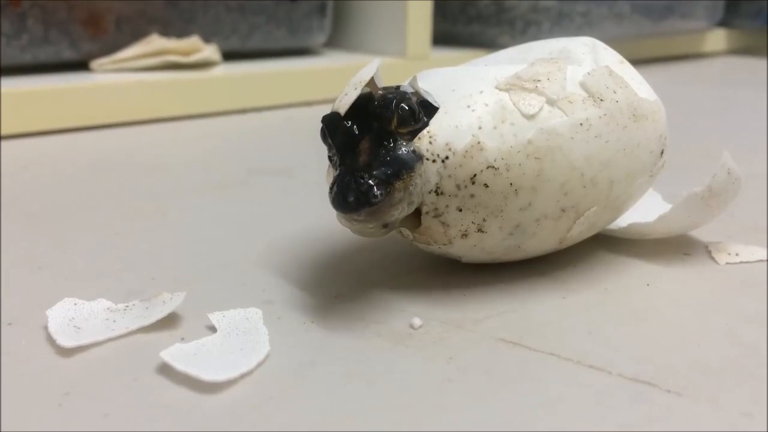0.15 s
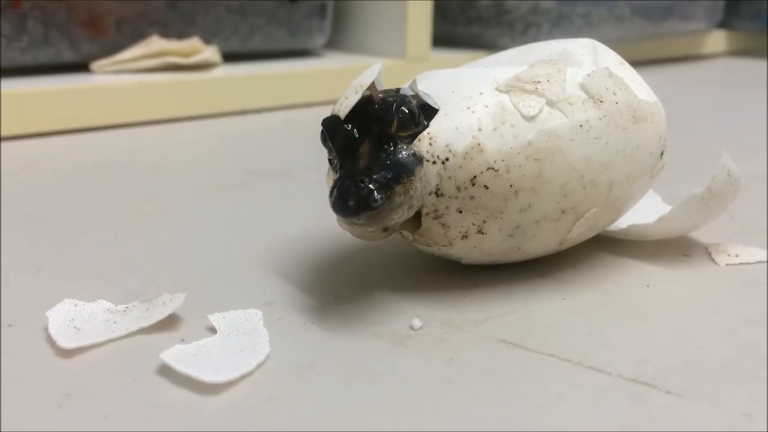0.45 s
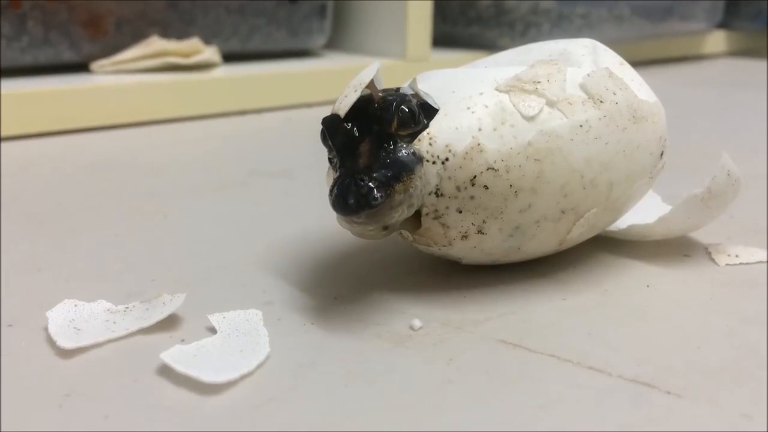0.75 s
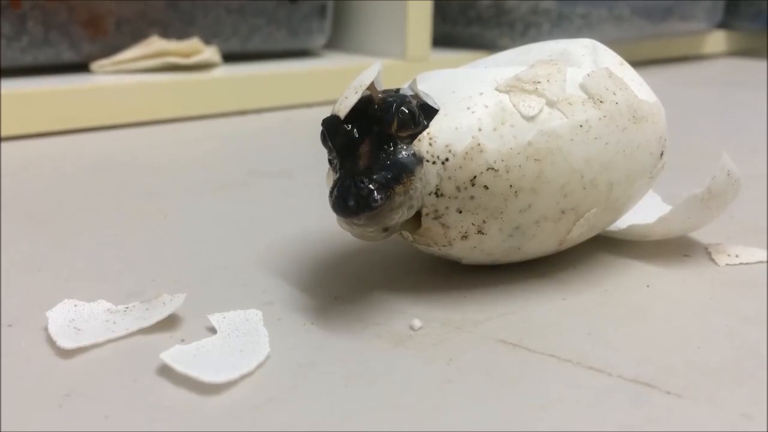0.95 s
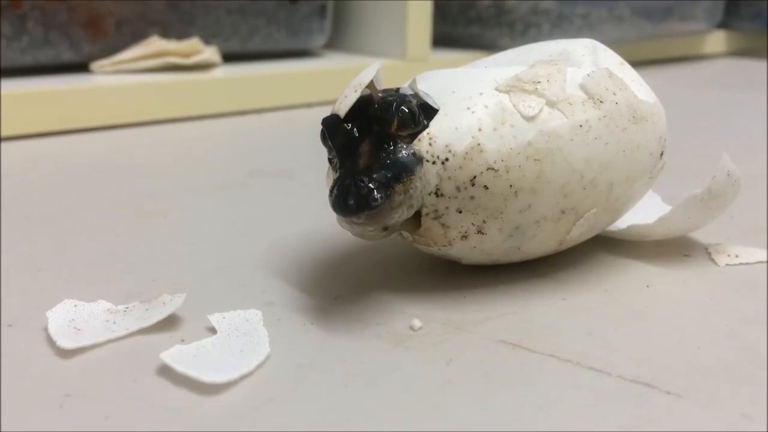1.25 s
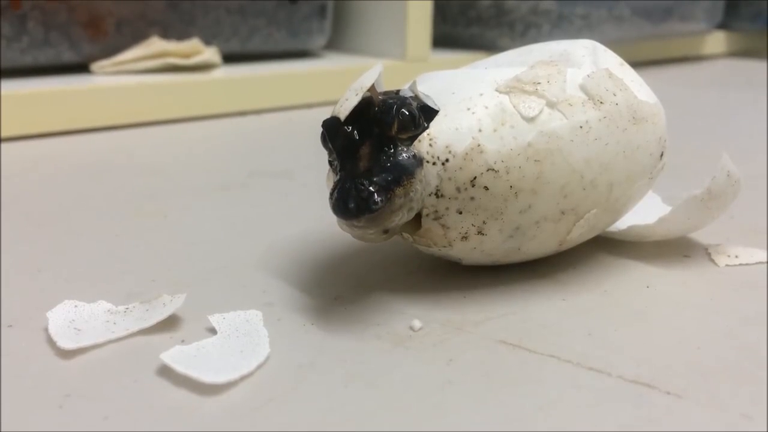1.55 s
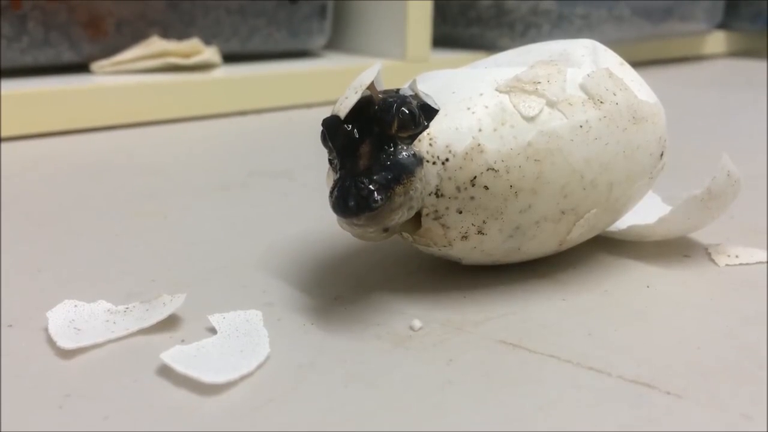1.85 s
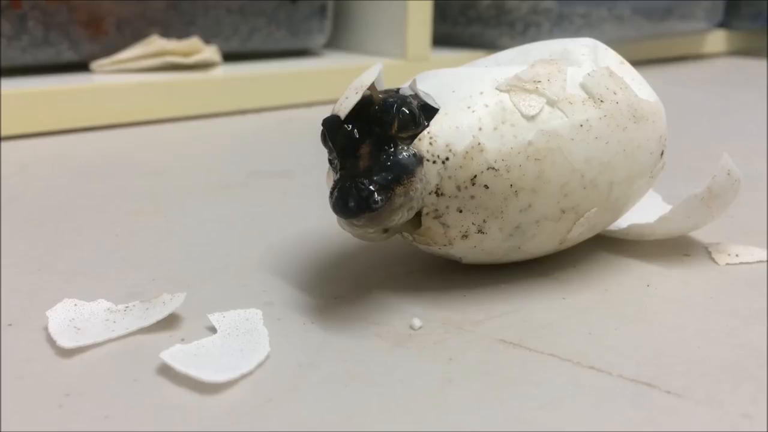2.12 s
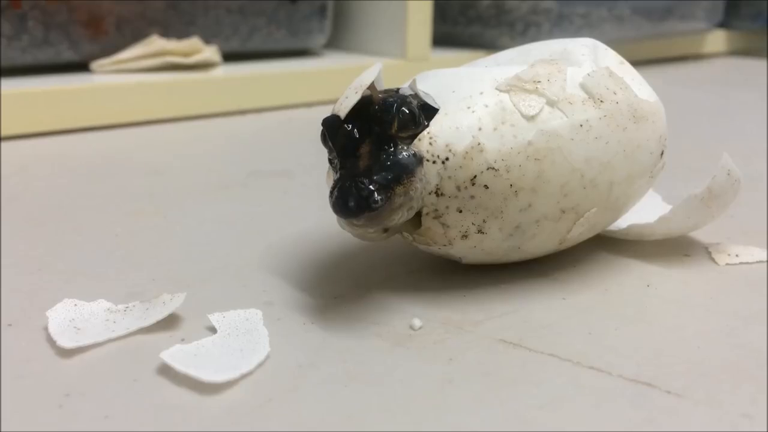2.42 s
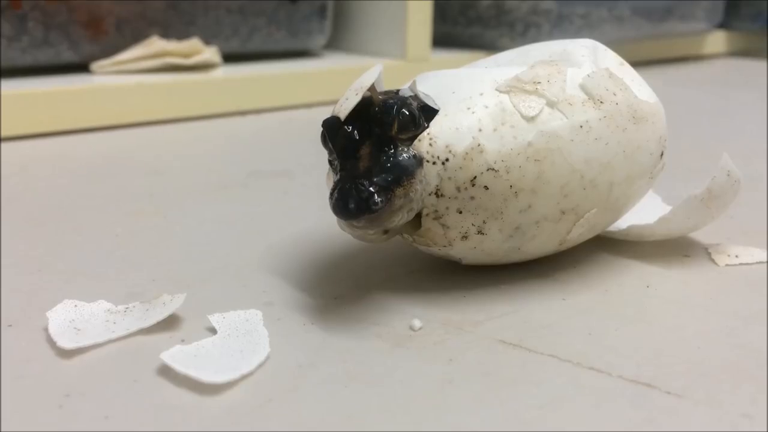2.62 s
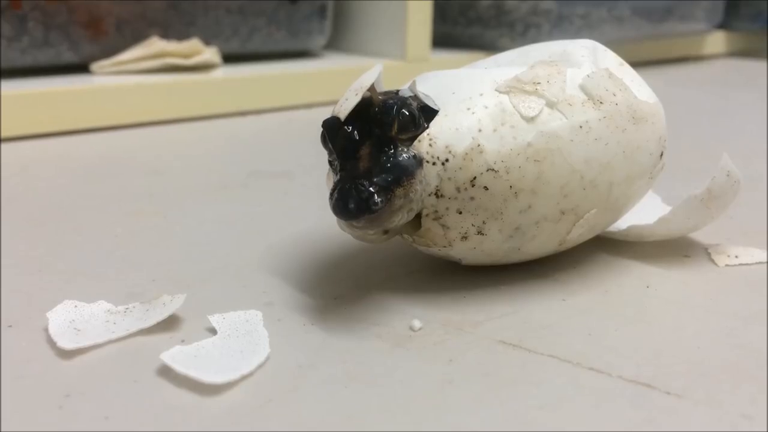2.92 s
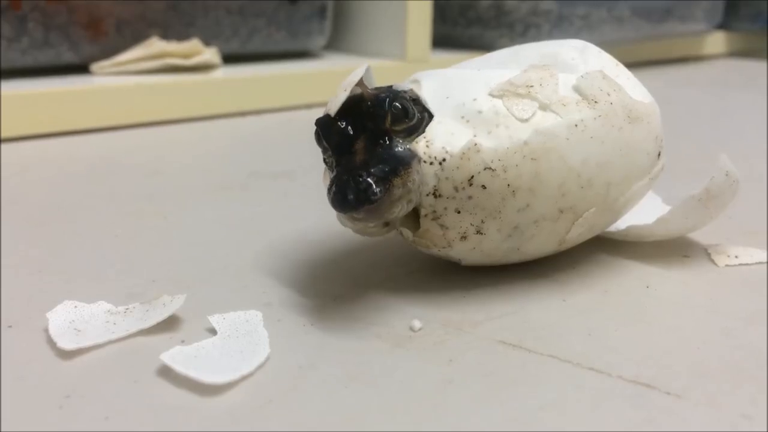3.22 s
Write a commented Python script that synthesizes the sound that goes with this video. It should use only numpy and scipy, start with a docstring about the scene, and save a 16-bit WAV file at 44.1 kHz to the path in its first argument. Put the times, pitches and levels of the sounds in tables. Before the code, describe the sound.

One brief falling chirp from a hatching baby alligator, after seconds of faint ventilation noise.

```python
"""Hatchling alligator, one yelp

Small room, phone microphone close by: ventilation hums, a motor tone fades in and out, something rustles.
Far-off peeps are swept sines; air, hums and rustle are shaped noise.
A hatchling, head out of its egg on a table, gives one falling yelp: harmonics and rasp through a throat.
Its push sets the table ringing in low damped modes. The room echoes the peeps and the yelp;
their mid range is repeated faintly higher up by frequency shifting.
"""
import sys
import numpy as np
from scipy import signal
from scipy.fft import rfft, irfft
from scipy.io import wavfile
from scipy.ndimage import uniform_filter1d

SR = 44100
rng = np.random.default_rng(int(sys.argv[2]) if len(sys.argv) > 2 else 0)


def materialize(psi):
    """Save the field psi as 16-bit PCM at rate SR to the path in sys.argv[1].

    A 1-D psi becomes a single channel; in a 2-D psi each row is a channel.
    """
    bounded = np.clip(np.atleast_2d(psi).T, -1, 1)
    quanta = np.round(bounded * 32767).astype(np.int16)
    wavfile.write(sys.argv[1], SR, quanta)


def volts(x):
    """Linear amplitude factor 10**(x/20) for a level x in dB, scalar or array-like."""
    e = np.asarray(x, float) / 20
    return 10 ** e


N = 148617  # samples


def colour(hz, table):
    """Gain at hz from an (f/Hz, level/dB) table, interpolated over log frequency."""
    f, db = np.array(table, float).T
    return volts(np.interp(np.log(np.maximum(hz, 1)), np.log(f), db))


def noise(shape):
    """Noise of rms 1 with the amplitude spectrum shape(Hz)."""
    x = irfft(rfft(rng.standard_normal(N)) * shape(np.fft.rfftfreq(N, 1 / SR)), N)
    return x / x.std()


def walk(rate):
    """Smooth random drift, rms about 1: levels held 1 / rate s and averaged twice."""
    hold = int(SR / rate)
    steps = np.repeat(rng.standard_normal(N // hold + 1), hold)
    return 1.42 * uniform_filter1d(uniform_filter1d(steps, hold), hold)[:N]


# spectrum of the room air: f/Hz, relative level per Hz/dB
AIR_SPECTRUM = [(15, -3.5), (30, -3.5), (55, -1), (140, -1), (250, -9.5), (450, -11), (800, -16.5),
                (1500, -21), (3000, -25.5), (4400, -28), (4650, -30.5), (7000, -31), (9500, -34),
                (12000, -35), (14000, -35.5), (15400, -43)]
AIR_DB, SWELL_DB, FLICKER_DB = -61.5, -0.57, 2.5


def room_air():
    """Octave bands of hiss swell together and flicker alone, the low ones most."""
    swell = walk(1.5)
    white = rfft(noise(lambda f: colour(f, AIR_SPECTRUM)))
    octave = np.log2(np.maximum(np.fft.rfftfreq(N, 1 / SR), 1) / 16)  # octaves above 16 Hz
    air = 0
    for k in range(11):
        depth = 1 / (1 + (k / 6) ** 4)
        band = irfft(white * np.clip(1 - abs(octave - k), 0, 1), N)
        air = air + band * volts(depth * (SWELL_DB * swell + FLICKER_DB * walk(22.97)))
    return volts(AIR_DB) * air


# standing tones of the ventilation: f/Hz, width at half amplitude/Hz, level before the swell/dB
HUM_TONES = [(85, 7.6, -62.5), (109.5, 8.7, -60.5), (175.6, 12.6, -67), (296.4, 17, -78),
             (393.5, 14, -76.5), (434.6, 12, -77.5), (565.3, 10, -81.5), (694.5, 47, -76.5),
             (1080, 16, -84.5)]
# the hums swell and sink together: t/s, gain/dB
HUM_SWELL_CURVE = [(0, -1), (.5, -1), (.9, 0), (1.4, 0.5), (1.85, 2.5), (2.3, -3.5), (2.7, 4), (3.37, -5.5)]
WAVER_DB = 1.5


def ventilation(t):
    """Each hum is a narrow band of noise wavering by itself under one common swell."""
    hum = 0
    for hz, width, db in HUM_TONES:
        tone = noise(lambda f: 1 / (1 + (2 * (f - hz) / width) ** 2))
        hum = hum + volts(db + WAVER_DB * walk(6.03)) * tone
    return hum * volts(np.interp(t, *np.array(HUM_SWELL_CURVE).T))


# fading of the motor tone: t/s, level/dB
MOTOR_FADE = [(0, -71.5), (.2, -65.5), (.7, -65.5), (.85, -73), (1.05, -82), (1.3, -69), (1.8, -71),
              (2.1, -76), (2.4, -71), (2.8, -73), (3.1, -74), (3.37, -83)]
MOTOR_HZ, MOTOR_DRIFT, MOTOR_WAVER_DB = 222.3, 0.0067, 2.2  # drift: share of the pitch


def motor(t):
    """One sine fades in and out, wavering slightly in pitch and level."""
    s, db = np.array(MOTOR_FADE).T
    level = volts(np.interp(t, s, db) + MOTOR_WAVER_DB * walk(19))
    pitch = MOTOR_HZ * (1 + MOTOR_DRIFT * walk(5.16))
    return np.sqrt(2) * level * np.sin(2 * np.pi * np.cumsum(pitch) / SR)


# far-off peeps: t/s, length/s, start f/Hz, end f/Hz, peak level before the flutter/dB
FAR_PEEPS = [(.664, .036, 1540, 1060, -62.5), (.69, .06, 960, 700, -69), (1.07, .125, 1060, 1100, -70.5),
             (1.14, .065, 1310, 1410, -76)]
FAR_ROUGH, FAR_WOBBLE = 0.5, 0.025  # shares of the amplitude and of the pitch


def sibling(t):
    """Faint peeps from far away: swept sines broken up by random flutter."""
    flutter = 1 + FAR_ROUGH * walk(120)
    wobble = 1 + FAR_WOBBLE * walk(60)
    out = 0
    for s, length, hz0, hz1, db in FAR_PEEPS:
        u = np.clip((t - s) / length, 0, 1)
        pitch = wobble * hz0 * (hz1 / hz0) ** u
        envelope = np.sin(np.pi * u ** 0.57)
        out = out + volts(db) * envelope * np.sin(2 * np.pi * np.cumsum(pitch) / SR)
    return out * flutter


# the mid range repeated faintly higher up: upward shift f/Hz, gain/dB
SHIFTS = [(3780, -40), (7600, -55), (11300, -52.5)]
MID_FROM_HZ, MID_TO_HZ = 650, 2300
SQUEEZE = 0.4  # the repeats follow the level of their source only in part


def shifted_mid_range(x, t):
    """The mid range of x, tilted brighter and levelled in part, is repeated faintly higher up."""
    bright = signal.lfilter(*signal.butter(2, MID_TO_HZ, "high", fs=SR), x)
    band = signal.butter(4, [MID_FROM_HZ, MID_TO_HZ], "band", fs=SR, output="sos")
    mid = signal.hilbert(signal.sosfilt(band, bright))
    mid = mid / (uniform_filter1d(abs(mid), size=200) + 1e-3) ** SQUEEZE
    return sum(volts(db) * (mid * np.exp(2j * np.pi * shift_hz * t)).real for shift_hz, db in SHIFTS)


ECHO_DB, ECHO_T60_S, ECHO_GAP_S = -7.5, 0.2, 0.003


def echo(x):
    """Diffuse reflections of a small room: a decaying noise tail after a short gap."""
    u = np.arange(SR // 2) / SR
    tail = rng.standard_normal(len(u)) * 1000. ** (-u / ECHO_T60_S) * (u > ECHO_GAP_S)
    tail = tail / np.sqrt(np.sum(tail ** 2))
    return volts(ECHO_DB) * signal.fftconvolve(x, tail)[:N]


# a soft rustle somewhere in the room: peak t/s, rise/s, fall/s, centre f/Hz, peak level/dB
RUSTLE_SWELLS = [(.71, .04, .09, 700, -67)]


def rustle(t):
    """Mid-range noise swells briefly, rising faster than it falls."""
    out = 0
    for s, rise, fall, hz, db in RUSTLE_SWELLS:
        envelope = np.exp(-((t - s) / np.where(t < s, rise, fall)) ** 2)
        out = out + volts(db) * envelope * noise(lambda f: np.exp(-np.log2(np.maximum(f, 1) / hz) ** 2))
    return out


# modes of the table top under the egg: f/Hz, gain/dB, t60/s
TABLE_MODES = [(89, 5, 0.1), (47.4, 5.5, 0.13), (153, -10.5, 0.15)]
# shoves of the egg: t/s, strength/dB
EGG_SHOVES = [(3.271, -40.5), (3.281, -35.5), (3.304, -31), (3.325, -40), (3.336, -28.5)]
SHOVE_S = 0.0024  # time constant of the soft onset
TABLE_LOW_HZ = 38  # the table radiates little under this


def table(t):
    """Soft shoves of the egg set the table top ringing in low damped modes."""
    out = 0
    for s, db in EGG_SHOVES:
        u = np.maximum(t - s, 0)
        ringing = sum(volts(g) * np.sin(2 * np.pi * hz * u) * 1000. ** (-u / t60)
                      for hz, g, t60 in TABLE_MODES)
        out = out + volts(db) * (1 - np.exp(-u / SHOVE_S)) * ringing
    return signal.sosfilt(signal.butter(2, TABLE_LOW_HZ, "high", fs=SR, output="sos"), out)


# course of the yelp: t/s, f/Hz, effort/dB, then extra gain/dB of the second, third and higher harmonics
YELP_COURSE = [(3.291,1070,-27,-3,12,8),(3.296,1028,-20,-16,6,5),(3.299,958,-20.5,-8,-1.5,-3),(3.302,909.5,-21.5,-2,-6,-10.5),(3.311,744.8,-13.5,-3.5,-10,-7),(3.317,679.8,-18.5,-3.5,-5,-8),(3.322,606.8,-17.5,-4.5,3,-0.5),(3.331,496.3,-19.5,-1,-6,2.5),(3.342,401.8,-21,4,6.5,4.5),(3.35,353.4,-19,-0.5,-2.5,-3.5),(3.357,303.3,-24.5,-11,8,3),(3.364,292.4,-31.5,-6.5,5.5,5.5),(3.37,271,-27.5,-15,-3,0)]
# harmonics at the glottis: multiple of the pitch, strength/dB
GLOTTIS = [(1, -1.5), (2, 1), (3, -11), (4, -7.5), (5, -10), (6, -13.5), (7, -14.5), (8, -24.5), (9, -15.5),
           (10, -27), (11, -28), (12, -36.5)]
# throat and shell colour: f/Hz, gain/dB
THROAT_COLOUR = [(200, 10.5), (350, -12.5), (550, -4.5), (800, -3), (1050, -4.5), (1300, -7), (1650, -16.5),
                 (2000, -10.5), (2400, -18.5), (2800, -33), (3300, -15.5), (4200, -41.5)]
# colour of the rasp: f/Hz, relative level/dB
RASP_COLOUR = [(250, -5), (600, -10), (1200, -8), (2200, 1), (2900, -7.5), (3900, -8), (4200, -29),
               (4600, -41), (7000, -34.5), (8000, -53)]
RASP_DB = -23  # before the effort
ATTACK_S = 0.002
JITTER = 0.0037  # share of the pitch
RING_HZ, RING_WIDTH_HZ = 770, 250  # throat resonance that turns the phase of each harmonic


def yelp(t):
    """Falling harmonics pass through the throat; breath rasps once a cycle."""
    s, hz, db, second_db, third_db, upper_db = np.array(YELP_COURSE).T
    pitch = np.exp(np.interp(t, s, np.log(hz))) * (1 + JITTER * walk(300))
    phase = 2 * np.pi * np.cumsum(pitch * (t > s[0])) / SR
    effort = volts(np.interp(t, s, db)) * np.clip((t - s[0]) / ATTACK_S, 0, 1)
    voice = 0
    for k, strength_db in GLOTTIS:
        extra_db = np.interp(t, s, (k == 2) * second_db + (k == 3) * third_db + (k > 3) * upper_db)
        f = k * pitch
        lag = np.arctan2(f * RING_WIDTH_HZ, RING_HZ ** 2 - f ** 2)
        voice = voice + volts(strength_db + extra_db) * colour(f, THROAT_COLOUR) * np.cos(k * phase - lag)
    puffs = (1 + np.cos(phase)) ** 2 * rng.standard_normal(N)
    rasp = irfft(rfft(puffs) * colour(np.fft.rfftfreq(N, 1 / SR), RASP_COLOUR), N)
    rasp = volts(RASP_DB) * rasp / rasp.std()
    return effort * (np.sqrt(2) * voice + rasp)


def scene():
    """All sources in one channel, with the room's echo and the faint repeats higher up."""
    t = np.arange(N) / SR
    background = room_air() + ventilation(t) + motor(t)
    calls = sibling(t) + yelp(t)
    calls = calls + echo(calls)
    repeats = shifted_mid_range(calls, t)
    return (background + calls + repeats + rustle(t) + table(t))[None]


def band_limit(x):
    """A steep low-pass at the top of the band."""
    return signal.sosfilt(signal.butter(12, 15440, fs=SR, output="sos"), x)


MIC_LOW_HZ = 35


def record(dry):
    """The phone's microphone drops the deepest bass."""
    mic = signal.sosfilt(signal.butter(2, MIC_LOW_HZ, "high", fs=SR, output="sos"), dry)
    return band_limit(mic)


dry = scene()
out = record(dry)
materialize(out)
```